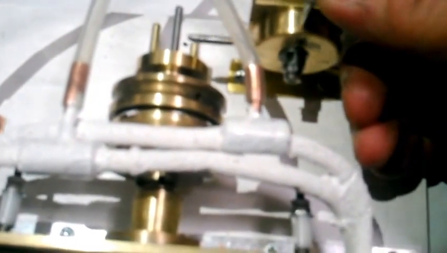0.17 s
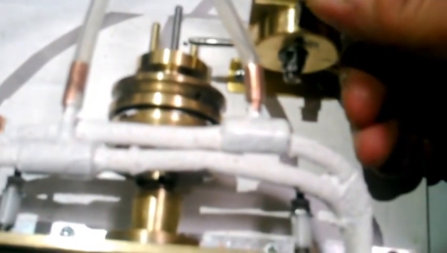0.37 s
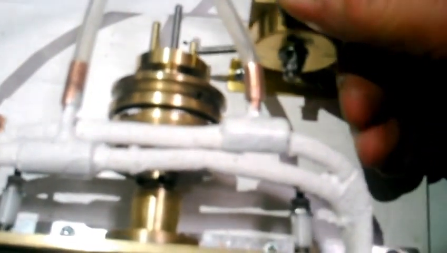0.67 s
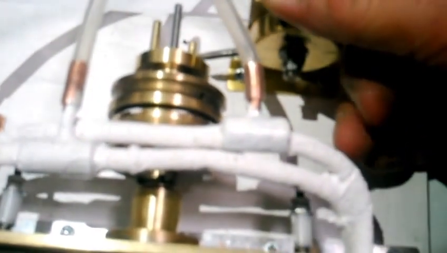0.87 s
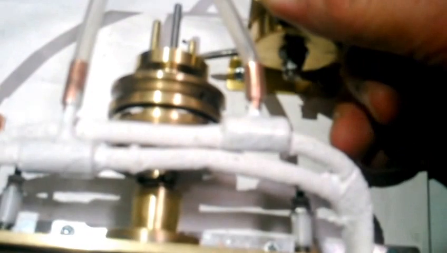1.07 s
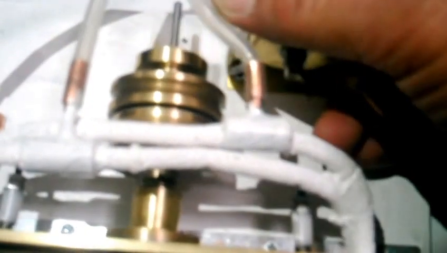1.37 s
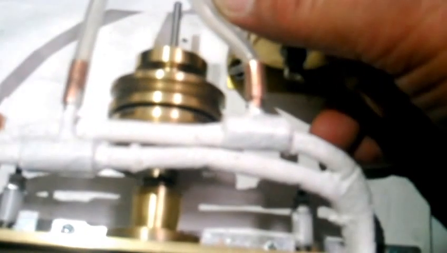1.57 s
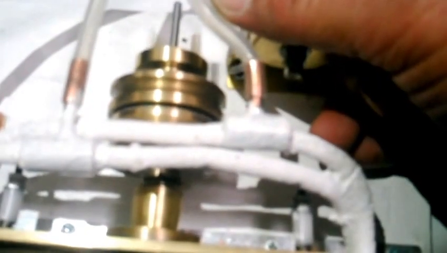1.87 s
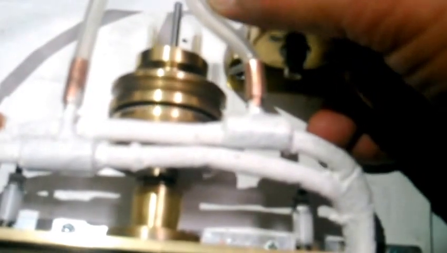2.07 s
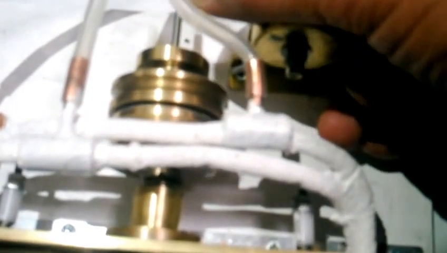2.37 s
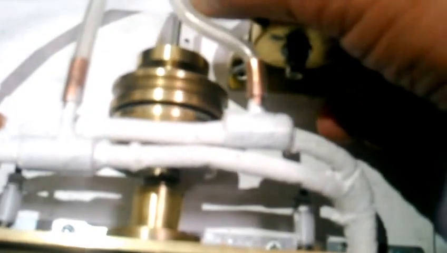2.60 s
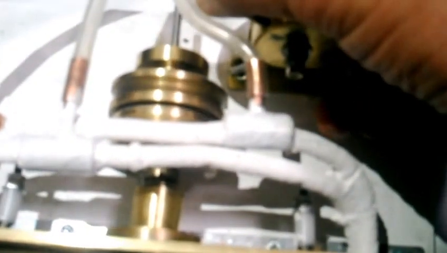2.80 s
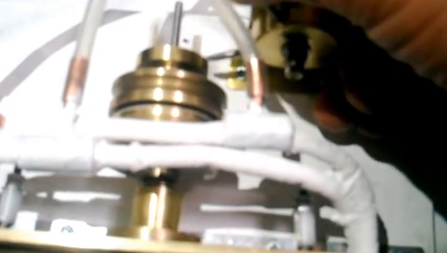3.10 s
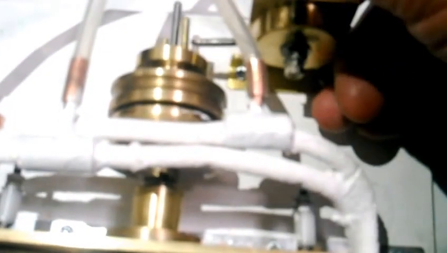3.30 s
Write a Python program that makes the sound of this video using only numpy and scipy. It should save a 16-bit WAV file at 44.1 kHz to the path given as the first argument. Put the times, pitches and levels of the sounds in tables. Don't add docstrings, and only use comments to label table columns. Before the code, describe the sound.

Compressed-air model engine starts, patters with crisp hissing knocks, then stops above steady pump hum

```python
import sys
import numpy as np
from scipy import signal
from scipy.fft import rfft, irfft
from scipy.io import wavfile
from scipy.ndimage import uniform_filter1d

SR = 44100
rng = np.random.default_rng(int(sys.argv[2]) if len(sys.argv) > 2 else 0)


def voltage_ratio(decibels):
    exponent = np.asarray(decibels, float) / 20
    return 10 ** exponent


def digitize_waveform(pressure):
    field = np.atleast_2d(pressure).T
    bounded = np.clip(field, -1, 1)
    quanta = np.round(bounded * 32767).astype(np.int16)
    wavfile.write(sys.argv[1], SR, quanta)


N = 152145


def read(points, hz):
    f, value = np.transpose(points)
    return np.interp(np.log(hz + 1), np.log(f + 1), value)


def curve(points):
    s, value = np.transpose(points)
    return np.interp(np.arange(N) / SR, s, value)


def evened(x):
    return x / np.sqrt(np.mean(x ** 2) + 1e-20)


def noise(tone, patchy_db):
    frames, hz = N // 128 + 5, np.fft.rfftfreq(512, 1 / SR)
    real, imaginary, patches = rng.standard_normal((frames, 257, 3)).T
    patches = uniform_filter1d(patches, size=12, axis=0)
    patches = evened(uniform_filter1d(patches, size=4, axis=1))
    gain = voltage_ratio(read(tone, hz)[:, None] + patchy_db * patches)
    spectrum = (real + 1j * imaginary) * gain
    return evened(signal.istft(spectrum, nperseg=512, noverlap=384)[1][:N])


def long_noise(tone):
    gain = voltage_ratio(read(tone, np.fft.rfftfreq(N, 1 / SR)))
    return evened(irfft(rfft(rng.standard_normal(N)) * gain, N))


# t/s, stroke rate/Hz
PUMP = [
    (0, 23.34),
    (1.33, 23.34),
    (1.62, 23.545),
    (3.45, 23.545),
]


def pump_angle():
    return 2 * np.pi * np.cumsum(curve(PUMP)) / SR


# f/Hz, width/Hz, level/dB
CASING = [(238, 60, -76), (580, 89, -77), (669, 29, -67), (803, 35, -69.5), (1077, 58, -75),
          (1278, 48, -71), (1490, 127, -71.5), (1704, 80, -76.5)]


def casing_ring(turn):
    out = np.zeros(N)
    for order in range(6, 80):
        f0 = order * PUMP[0][1]
        near = max(db - 10 * np.log10(1 + (2 * (f0 - f) / width) ** 4) for f, width, db in CASING)
        phase = 0.68 * rng.standard_normal()
        out += np.sqrt(2) * voltage_ratio(near) * np.sin(order * turn + phase)
    return out


# multiple of pump speed, level/dB
ORDERS_DB = [(1, -65), (30, -56.5), (31, -52), (32, -59)]
# multiple of pump speed, level/dB
SLOT_DB = [(22, -61), (23, -52.5), (24, -62)]
LOADED_DB = [-1, -9.5, -2.5, -5.5, 7, -1, -1]


def motor_tones(turn):
    mains_hz, waver_db = 200, 2
    t, load, out = np.arange(N) / SR, valve(), np.zeros(N)
    tones = [(order, db, 0) for order, db in ORDERS_DB] + [(order, db, mains_hz) for order, db in SLOT_DB]
    for (order, db, offset_hz), more_db in zip(tones, LOADED_DB):
        waver = evened(np.interp(t, np.arange(40) / 10, rng.standard_normal(40)))
        angle = np.round(order) * turn + 2 * np.pi * (offset_hz * t + rng.random())
        out += np.sqrt(2) * voltage_ratio(db + more_db * load + waver_db * waver) * np.sin(angle)
    return out


# t/s, level/dB
LEAK = [
    (0, -40),
    (.3, -38.5),
    (1.3, -37.5),
    (1.5, -40.5),
    (3.2, -43.5),
    (3.3, -45),
    (3.45, -41),
]
# f/Hz, level/dB per Hz
LEAK_TONE = [(1060, -48), (1800, -17.5), (2220, -16), (2640, -17.5), (6360, -12), (12400, 0), (15000, -5),
             (16000, -9.5)]


def leak(turn):
    throb = 1 + 0.22 * np.cos(turn + 1.85) + 0.062 * np.cos(2 * turn - 2.1)
    return voltage_ratio(curve(LEAK)) * throb * noise(LEAK_TONE, patchy_db=1.5)


def compressor():
    turn = pump_angle()
    return casing_ring(turn) + motor_tones(turn) + leak(turn)


# f/Hz, level/dB per Hz
ROOM = [(20, -3.5), (40, -5.5), (120, -16), (240, -12.5), (480, -17.5), (730, -8.5), (900, -16),
        (1500, -15.5), (2500, -23)]


def room():
    return voltage_ratio(-54) * long_noise(ROOM)


# t/s, level/dB
FLOW = [(1.31, -67), (1.336, -38), (1.35, -30.5), (1.375, -35), (1.395, -27.5), (1.42, -37), (1.47, -39),
        (2.0, -37.5), (3.25, -38.5), (3.31, -45), (3.36, -74)]
# f/Hz, level/dB per Hz
FLOW_TONE = [(600, -45), (1100, -18), (2300, -23.5), (4300, -9.5), (6700, -9), (11800, 1.5), (14000, -6),
             (16000, -19)]
# f/Hz, level/dB per Hz
RUMBLE = [(40, -3), (150, 0), (400, -5), (900, -2), (2000, -26.5)]


def exhaust():
    ticks_per_s, tick_db, tick_spread_db, tick_decay_s = 170, 0, 3.5, 0.0006
    strength = voltage_ratio(tick_db + tick_spread_db * np.minimum(rng.exponential(1, N), 3))
    ticks = strength * (rng.random(N) < ticks_per_s / SR)
    ticks = signal.oaconvolve(ticks, np.exp(-np.arange(400) / SR / tick_decay_s))[:N]
    hiss = noise(FLOW_TONE, patchy_db=2.5) + ticks * noise(RATTLE_TONE, patchy_db=4)
    return voltage_ratio(curve(FLOW)) * hiss + voltage_ratio(-55.5) * valve() * long_noise(RUMBLE)


def valve():
    return uniform_filter1d(np.clip((curve(FLOW) + 55) / 10, 0, 1), size=8000)


# f/Hz, width/Hz, lift/dB
BRASS = [(1350, 120, 4.5), (2786, 300, 5), (3160, 120, 6.5), (6550, 300, 5.5), (9080, 240, -1.5),
         (10430, 450, 6.5), (12100, 260, 3.5), (12720, 360, 6)]


def brass_response(tone, hz, luck):
    db = read(tone, hz) + np.zeros((len(luck), 1))
    for k, (f, width, lift_db) in enumerate(BRASS):
        shifted_hz = f * (1 + 0.015 * luck[:, [2 * k]])
        off = (hz - shifted_hz) / (width / 2)
        db = db + (lift_db + 2 * luck[:, [2 * k + 1]]) / (1 + off ** 2)
    log_gain = np.log(voltage_ratio(np.concatenate([db, db[:, -2:0:-1]], axis=1)))
    return np.exp(log_gain - 1j * signal.hilbert(log_gain).imag)[:, :len(hz)]


def knocks(rows, tone, bounce_delay_s, contact_s, bounce_contact_s, puff_t60_s, trim_db=0):
    size, lag_s = 4096, 0.0006
    s, peak_db, bounce_db, puff_db = np.transpose(rows)[:, :, None]
    t, hz = np.arange(size) / SR, np.fft.rfftfreq(size, 1 / SR)
    luck = rng.standard_normal((len(rows), 2 * len(BRASS) + 1))
    grit = rng.standard_normal((len(rows), size))
    contact = np.minimum(t / 0.00054, 1) * np.exp(-(t / (2 * contact_s)) ** 2)
    delay_s = bounce_delay_s * (1 + 0.099 * luck[:, -1:])
    late = np.maximum(t - delay_s, 0) / bounce_contact_s
    bounce = voltage_ratio(bounce_db) * late * np.exp(1 - late)
    puff = voltage_ratio(puff_db - 60 * t / puff_t60_s) * np.minimum(t / 0.0049, 1)
    push = (contact + bounce + puff) * grit
    sound = irfft(rfft(push) * brass_response(tone, hz, luck), size)
    sound = sound * voltage_ratio(peak_db + trim_db) / abs(sound).max(axis=1, keepdims=True)
    out = np.zeros(N + size)
    for start, one in zip(s[:, 0], sound):
        out[round((start + lag_s) * SR):][:size] += one
    return out[:N]


# t/s, peak level/dB, bounce level/dB, puff level/dB
VENT = [(1.5994, -22.5, -7, -11), (1.6995, -18.5, -11, -10), (1.8056, -18.5, -6, -10),
        (1.9228, -13.5, -1, -6), (2.0415, -13.5, -4.5, -11.5), (2.1658, -14.5, -2, -10),
        (2.2895, -13.5, -8, -11), (2.4152, -12, -5, -16.5), (2.5421, -13, 0, -13), (2.6681, -15, -5.5, 2),
        (2.7948, -13.5, -7, -5), (2.9215, -14, -6, -3), (3.0493, -12.5, -2.5, -5.5),
        (3.1775, -10, -3.5, -11), (3.3336, -26, -4, -13), (1.5094, -18.5, -7, -6), (1.379, -29, -9, -11)]
# f/Hz, level/dB per Hz
VENT_TONE = [(150, -21.5), (900, -14), (2200, -11.5), (6800, -5), (9000, -4), (11500, -1.5), (16000, -12.5)]


def vent():
    return knocks(VENT, VENT_TONE, bounce_delay_s=.0035, contact_s=.001,
                  bounce_contact_s=.0015, puff_t60_s=0.13)


# t/s, peak level/dB, bounce level/dB, puff level/dB
SNAP = [(1.5586, -5.5, -10, -18), (1.6571, -8, -9, -13), (1.7607, -8, -14.5, -13), (1.8721, -11, -10, -17),
        (1.9887, -7, -10.5, -14), (2.1111, -9, -12, -17), (2.2346, -10, -7, -13), (2.3598, -9.5, -12, -16),
        (2.4865, -9.5, -14, -13), (2.6132, -10, -16, -14), (2.74, -9, -14, -17), (2.8662, -8, -8.5, -12),
        (2.9941, -6.5, -10.5, -15.5), (3.1211, -7, -10.5, -16), (3.2513, -15, -15, -11),
        (1.4061, -10, -22, -26), (1.4569, -12, -25, -25)]
# f/Hz, level/dB per Hz
SNAP_TONE = [(150, -21), (900, -21), (2200, -16.5), (5500, -14), (9000, -9), (11000, -2.5), (13000, -5),
             (16000, -21.5)]


def snap():
    return knocks(SNAP, SNAP_TONE, bounce_delay_s=0.0014, contact_s=.0006,
                  bounce_contact_s=.001, puff_t60_s=0.085)


# t/s, peak level/dB, bounce level/dB, puff level/dB
RATTLE = [(1.422, -13, -16, -7.5), (1.533, -13, -1.5, -13), (1.630, -14, -1, -3), (1.7325, -14.5, -11, -17),
          (1.840, -15, -5, -6), (1.956, -14, 1, -15), (2.0765, -13, 2, -9), (2.2014, -14, 2, -9),
          (2.3255, -14, 2, -12), (2.452, -14.5, -2, -12), (2.5784, -13, 2, -9), (2.705, -15.5, -2, -6),
          (2.8314, -14.5, 0, -8), (2.958, -15.5, 2.5, -10), (3.0864, -14.5, 1, -6),
          (3.2144, -15.5, 3.5, -11)]
# f/Hz, level/dB per Hz
RATTLE_TONE = [(150, -22), (900, -13.5), (2200, -8.5), (5000, -10.5), (9000, -6), (11000, -1),
               (16000, -14.5)]


def rattle():
    return knocks(RATTLE, RATTLE_TONE, bounce_delay_s=.0065, contact_s=0.0039,
                  bounce_contact_s=0.00077, puff_t60_s=0.2, trim_db=1.17)


# t/s, peak level/dB, bounce level/dB, puff level/dB
SLAP = [(1.4796, -4.5, -7, -16), (1.5787, -6.5, -8.5, -6), (1.679, -13, -7, -5), (1.7833, -5.5, -10.5, -22),
        (1.8969, -9.5, -10, -10), (2.0146, -6.5, -8, -16), (2.1367, -7.5, -6.5, -19),
        (2.261, -6, -7.5, -18), (2.3862, -8.5, -9, -16), (2.513, -5, -9, -14), (2.6391, -5.5, -9, -16),
        (2.7657, -4.5, -10.5, -21), (2.8926, -5, -9, -14), (3.0203, -7, -12, -22), (3.1474, -7, -9.5, -22),
        (3.2832, -15.5, -7, -15)]
# f/Hz, level/dB per Hz
SLAP_TONE = [(150, -26), (900, -18.5), (2000, -12), (4500, -12.5), (9000, -11), (11500, 0.5), (13300, -5.5),
             (16000, -21.5)]


def slap():
    return knocks(SLAP, SLAP_TONE, bounce_delay_s=0.0045, contact_s=.0011,
                  bounce_contact_s=.0012, puff_t60_s=0.041)


def scene():
    engine = exhaust() + vent() + snap() + rattle() + slap()
    return (compressor() + room() + engine)[None]


def roll_off(x):
    return signal.sosfilt(signal.butter(12, 16810, fs=SR, output="sos"), x)


def record(dry):
    lowpass = signal.firwin(1023, 15800, window=("kaiser", 5), fs=SR)
    mix = signal.oaconvolve(dry, lowpass[None], "same")
    return roll_off(mix)


dry = scene()
out = record(dry)
digitize_waveform(out)
```